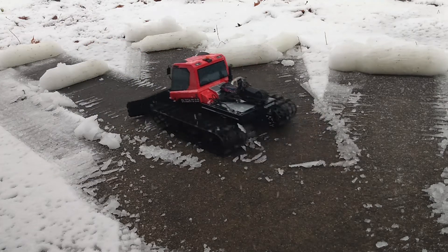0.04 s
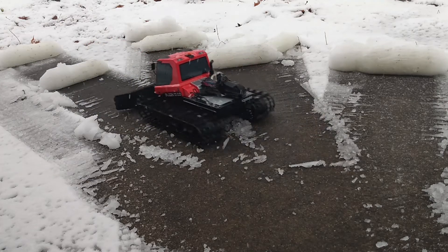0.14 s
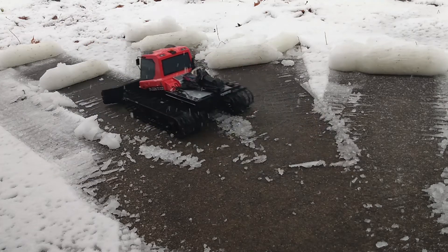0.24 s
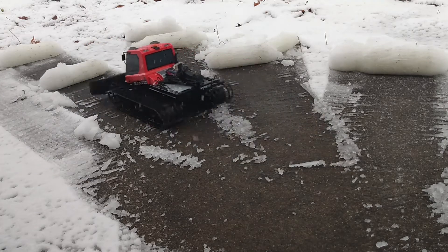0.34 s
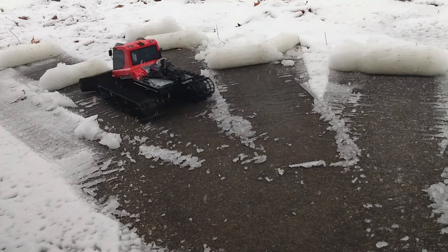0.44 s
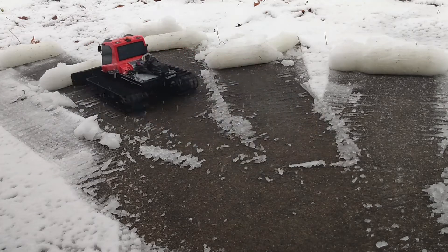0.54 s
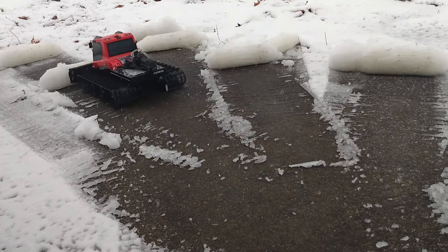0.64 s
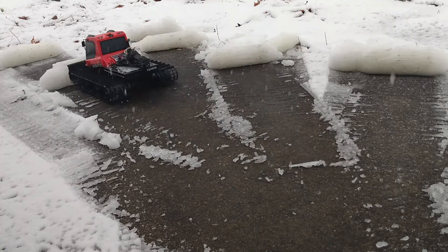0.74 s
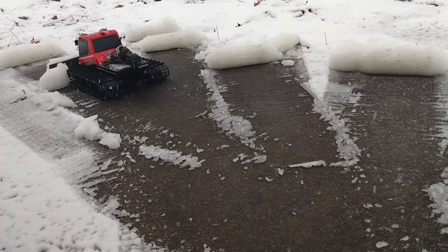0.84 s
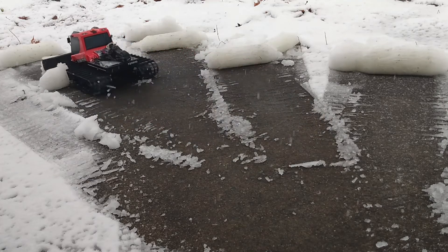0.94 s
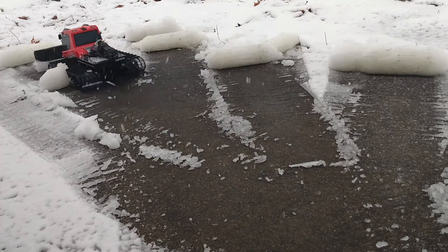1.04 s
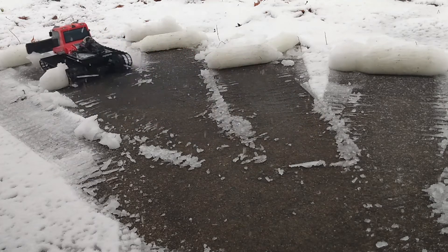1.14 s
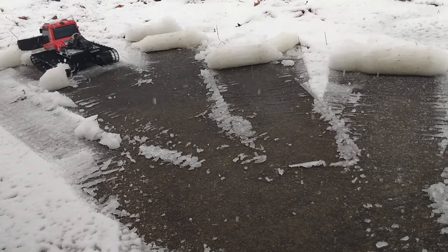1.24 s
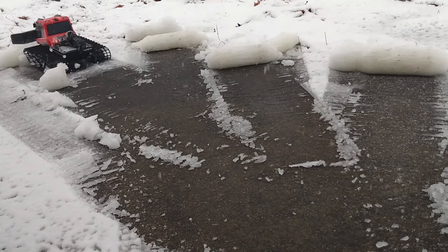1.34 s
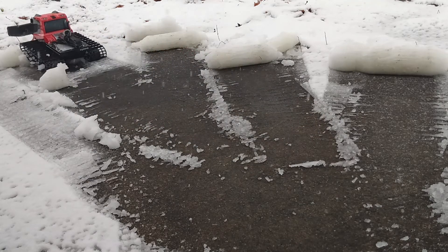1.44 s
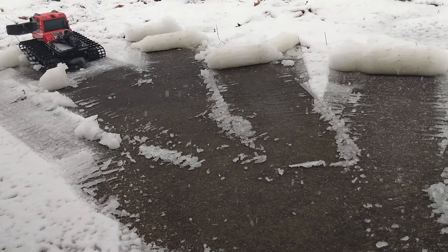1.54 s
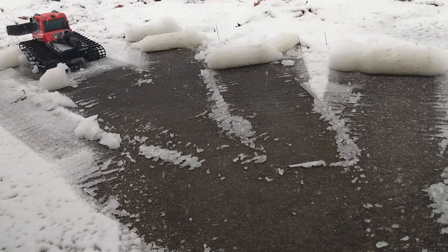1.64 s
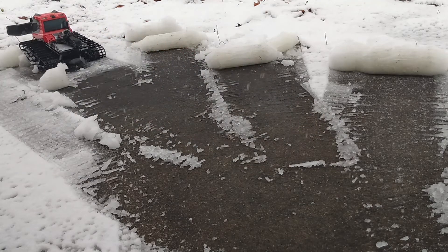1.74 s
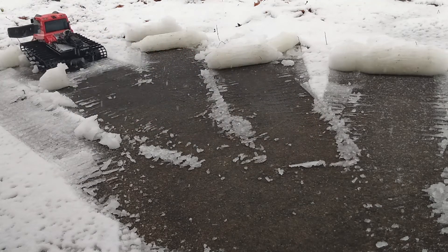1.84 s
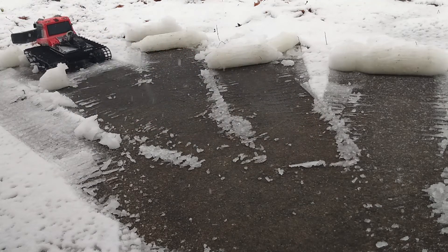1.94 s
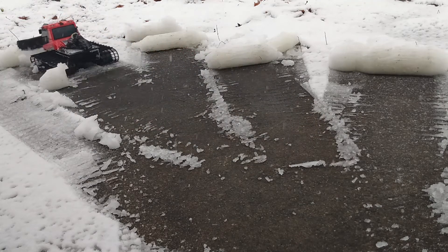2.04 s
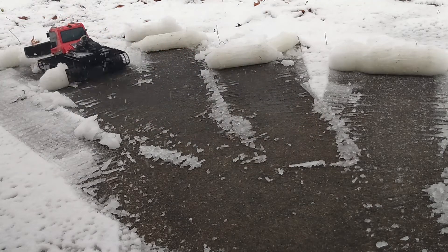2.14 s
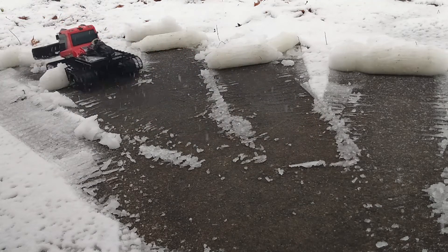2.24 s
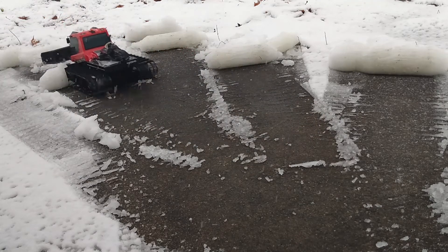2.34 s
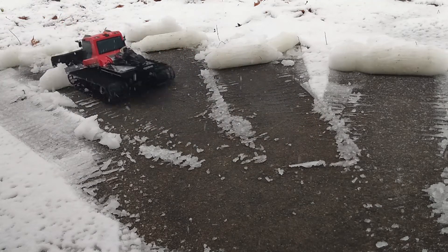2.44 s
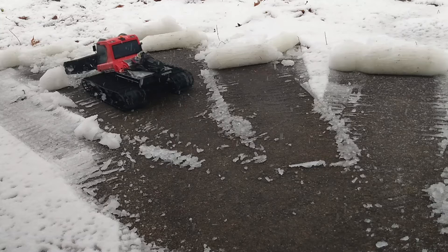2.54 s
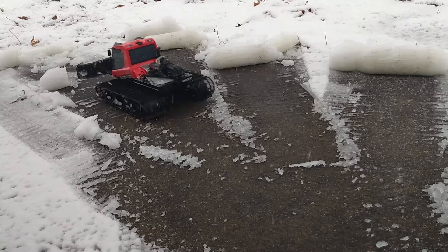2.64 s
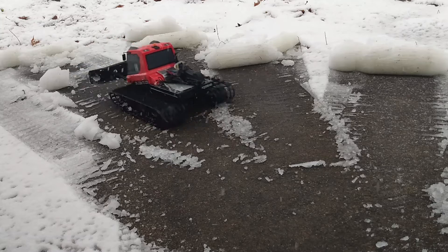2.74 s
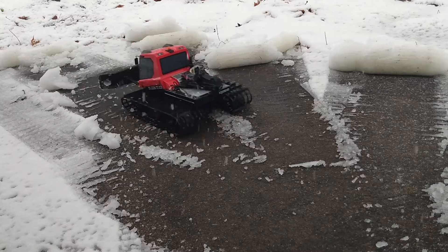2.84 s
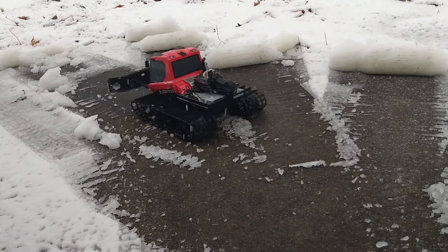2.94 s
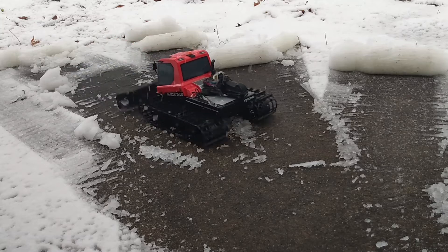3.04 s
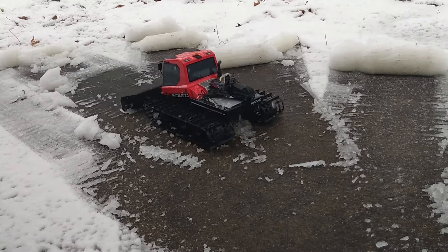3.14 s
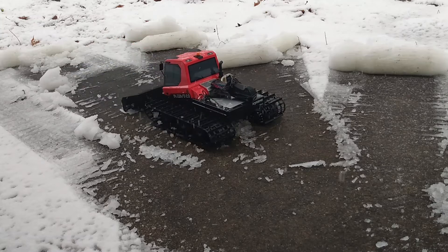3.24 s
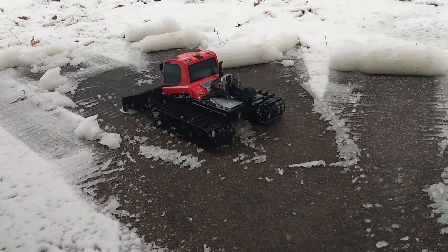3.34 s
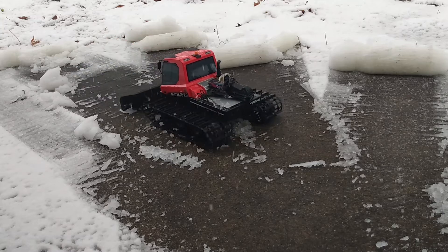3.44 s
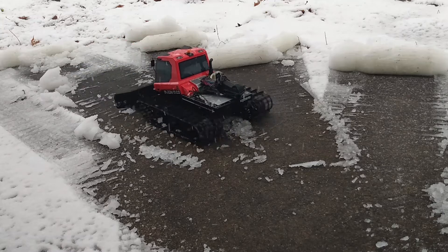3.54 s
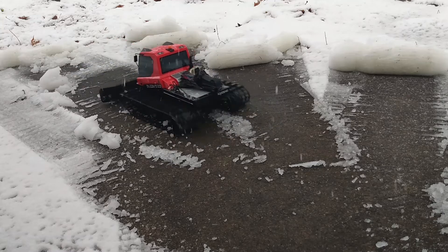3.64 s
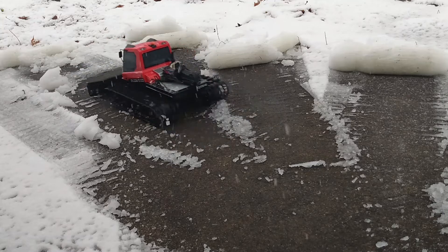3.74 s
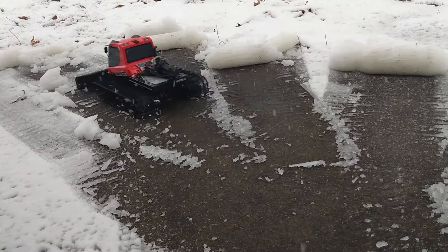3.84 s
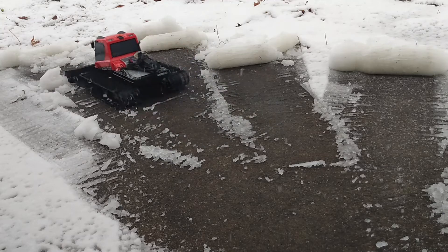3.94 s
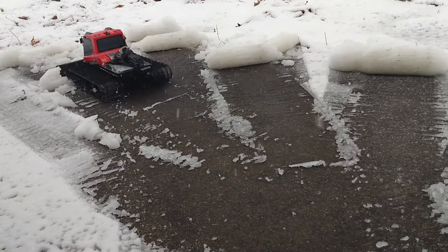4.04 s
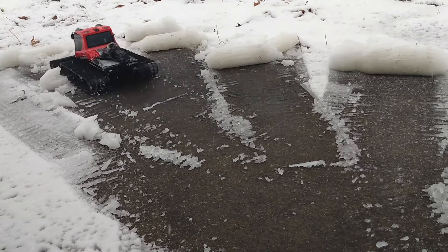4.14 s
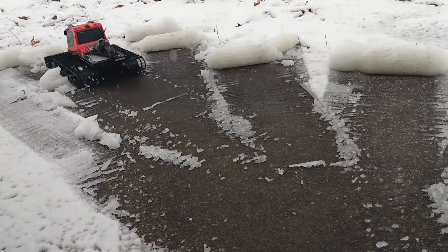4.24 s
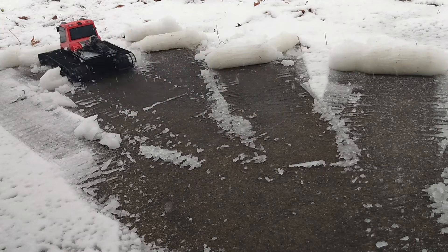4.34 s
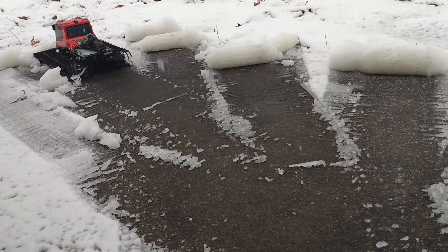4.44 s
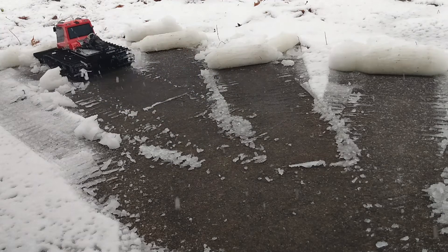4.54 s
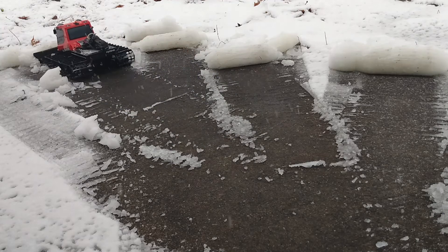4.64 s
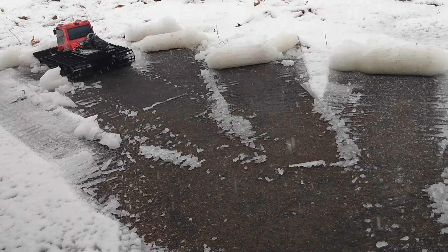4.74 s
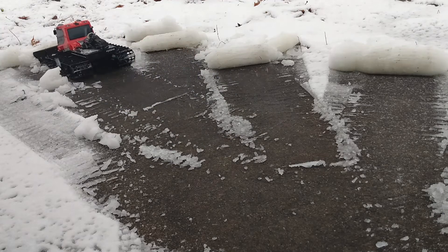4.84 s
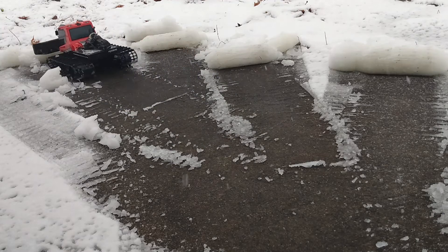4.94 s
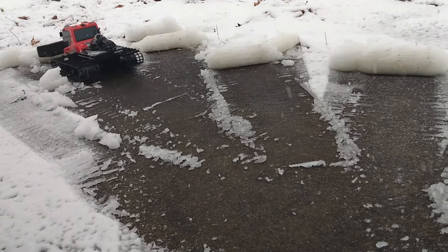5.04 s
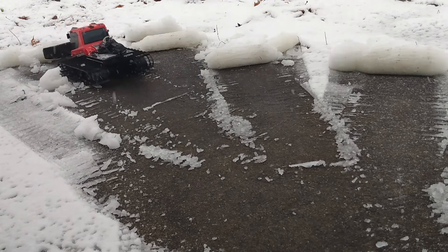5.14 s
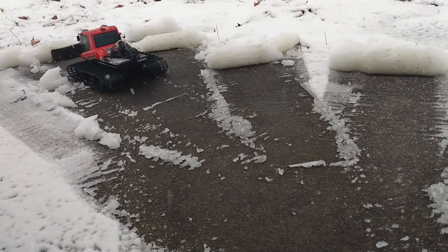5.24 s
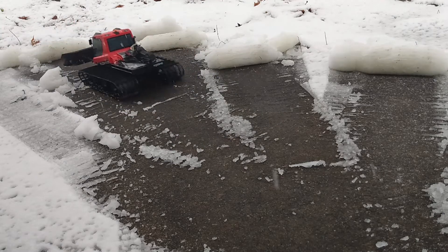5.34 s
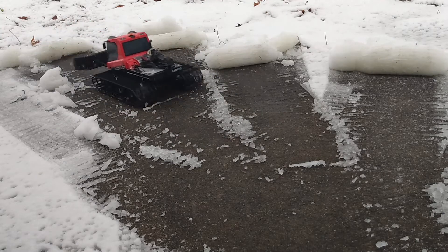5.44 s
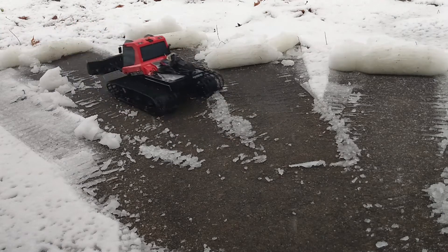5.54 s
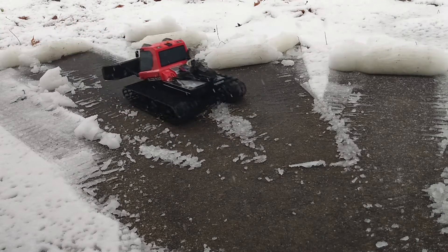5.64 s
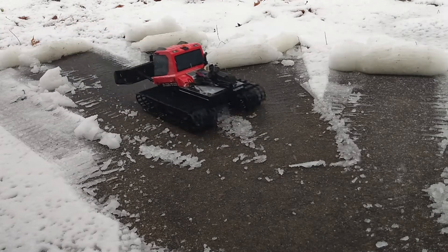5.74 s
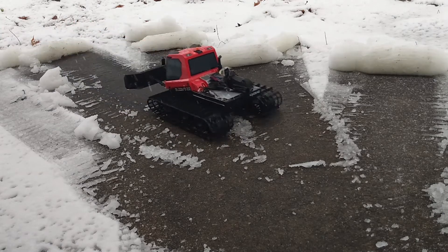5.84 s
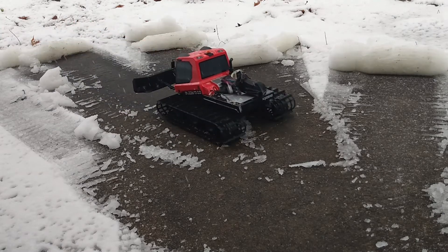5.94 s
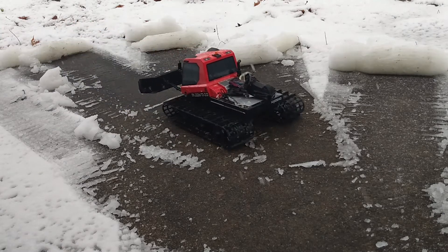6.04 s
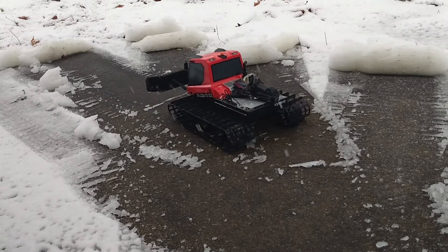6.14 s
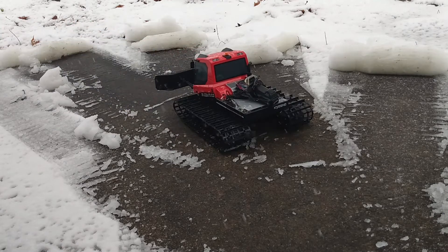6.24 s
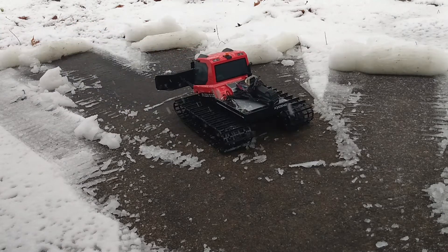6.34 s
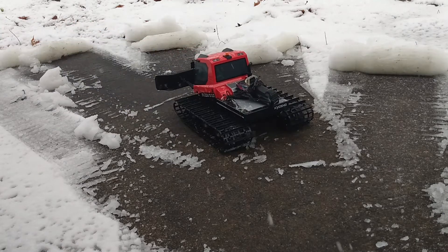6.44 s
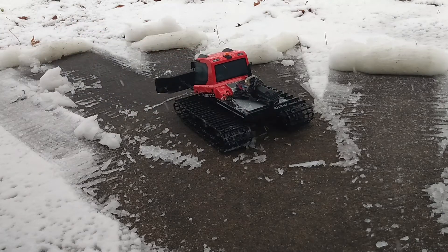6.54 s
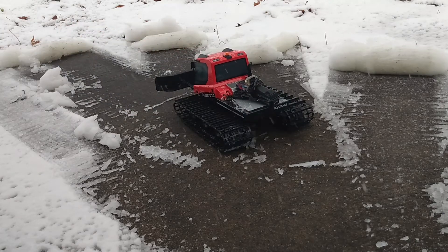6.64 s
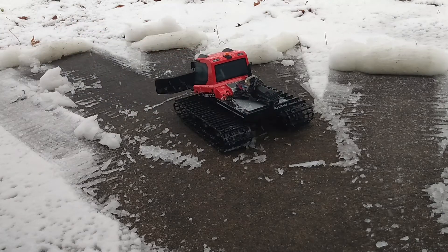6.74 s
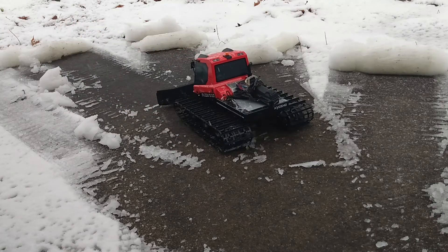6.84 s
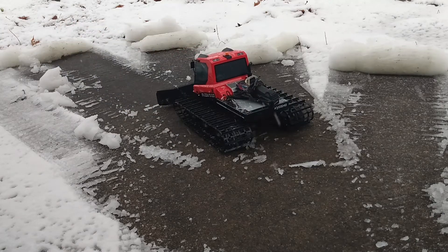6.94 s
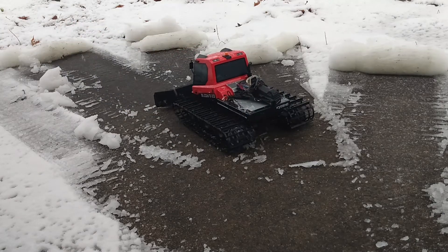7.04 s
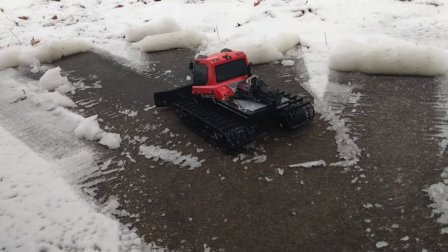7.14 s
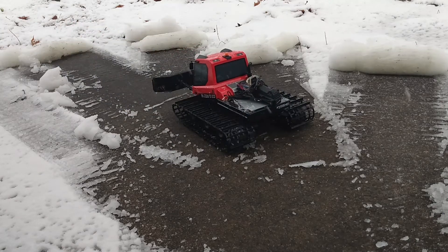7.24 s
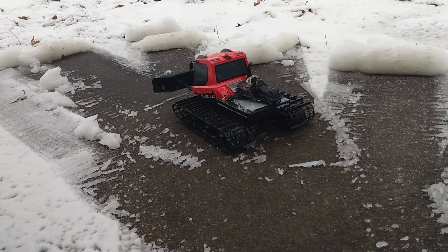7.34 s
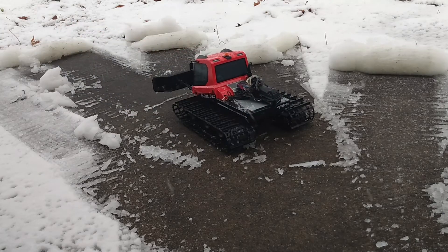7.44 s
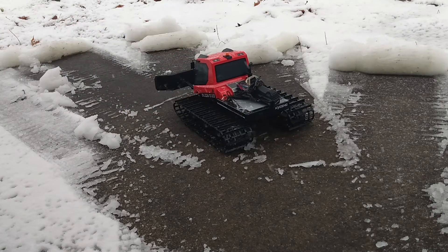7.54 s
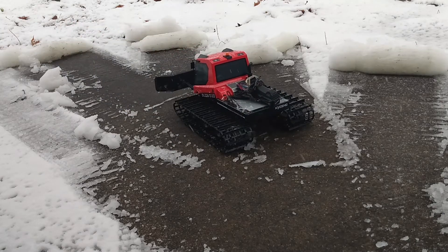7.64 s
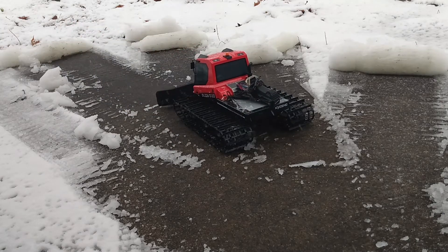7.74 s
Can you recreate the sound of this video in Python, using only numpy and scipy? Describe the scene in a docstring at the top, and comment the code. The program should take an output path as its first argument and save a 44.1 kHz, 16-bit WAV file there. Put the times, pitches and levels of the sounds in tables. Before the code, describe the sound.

A small electric tracked model drives over wet concrete outdoors, starting close to the microphone. Its tracks patter and clink, gears whine and slush fizzes underneath. The blade knocks hard at 0.4 seconds, followed by lighter clacks. The vehicle moves left, a little quieter, and crunches into snow with brief squeaks at about 1.3 seconds. After a short lull it reverses from 1.8 seconds, knocking as it comes close again by 3.3 seconds. A second run starts at 3.4 seconds with sharp ice snaps, knocks and a lower whine. It slows on the left around 4.7 seconds with more snaps, then backs up from 4.9 seconds and is near again by 6.2 seconds. From about 6.9 seconds to the end there are small, quieter nudges with a gritty hum, light knocks and ice ticks. Distant traffic rumbles low throughout.

```python
"""A small electric model snowcat drives off over wet concrete: its tracks patter, slush fizzes under them,
the gears whine, and the blade knocks hard at 0.4 s. It crunches into snow on the left, reverses from
1.8 s and is close again by 3.3 s. It makes the trip once more, snapping crumbs of ice, and is back by
6.2 s. It ends with small nudges, a gritty hum, light knocks and snaps. A town rumbles low throughout."""
import sys
import numpy as np
from scipy import signal
from scipy.fft import rfft, irfft
from scipy.io import wavfile
from scipy.ndimage import map_coordinates

SR = 44100
rng = np.random.default_rng(int(sys.argv[2]) if len(sys.argv) > 2 else 0)


def put_to_file(sound):
    """Save the sound as 16-bit audio at rate SR, in the file named by the first command-line argument."""
    columns = np.atleast_2d(sound).T  # one column per channel
    safe = np.clip(columns, -1, 1)
    whole_steps = np.round(safe * 32767)
    wavfile.write(sys.argv[1], SR, whole_steps.astype(np.int16))


N = 343980
TIME = np.arange(N) / SR


def amp(db):
    """Turns decibels into a number to multiply by."""
    return 10 ** (np.asarray(db) / 20)

def evened(x):
    """Scales a signal to an average power of 1."""
    return x / np.sqrt(np.mean(x ** 2) + 1e-20)

def curve_at(points, hz):
    """Looks up values between a table's frequencies, spaced by octaves."""
    f, value = np.transpose(points)
    return np.interp(np.log(hz + 1), np.log(f + 1), value)

def add(mix, start, sound):
    """Adds a sound to the mix at a time in seconds."""
    part = mix[max(round(start * SR), 0):][:len(sound)]
    part += sound[:len(part)]

def wander(hz):
    """A random wobble, up to about hz times a second."""
    f = np.fft.rfftfreq(N, 1 / SR)
    return evened(irfft(rfft(rng.standard_normal(N)) / (1 + (f / hz) ** 4), N))

def colour(x, points, peaks=(), size=4096):
    """Makes some frequencies louder and others softer; clicks ring only after they land."""
    hz = abs(np.fft.fftfreq(size, 1 / SR))
    lifts = sum(lift / (1 + (2 * (hz - f) / width) ** 2) for f, width, lift in peaks)
    log_gain = np.log(amp(curve_at(points, hz) + lifts))
    ring = np.fft.ifft(np.exp(np.conj(signal.hilbert(log_gain)))).real
    return signal.oaconvolve(x, ring[:size // 2])[:N]

def patter(per_s, spread_db):
    """Random clicks of uneven size; the average power stays the same at any rate."""
    size = amp(spread_db * np.clip(rng.standard_normal(N), -2, 2)) * rng.choice([-1, 1], N)
    return evened(size * (rng.random(N) < per_s / SR) / np.sqrt(per_s))

def scatter(x, ring_s):
    """Quick echoes off the hull and ground. Here and below, a ring time is the time to fade 60 dB."""
    t = TIME[:SR // 8]
    echoes = rng.standard_normal(len(t)) * amp(-60 * t / ring_s)
    uncoloured = irfft(np.exp(1j * np.angle(rfft(echoes, 2 * len(t)))))[:len(t)]
    return signal.oaconvolve(x, uncoloured / np.linalg.norm(uncoloured))[:N]

def push(start, rise, hold, fall):
    """The strength of one movement: it grows almost evenly, holds, then coasts to a soft stop."""
    up = np.clip((TIME - start) / rise, 0, 1)
    down = np.clip((start + rise + hold + fall - TIME) / fall, 0, 1)
    return up ** 1.3 * down ** 2.67


# Pushes of the throttle; the sprockets ring most in reverse: start/s, rise/s, hold/s, fall/s,
# close-up clatter/dB, then, compared with the clatter, slush/dB, gearbox/dB, sprockets/dB
THROTTLE = [(-.69, 1.21, .15, .66, -28.3, -6, -7, -11), (.72, .33, .28, .41, -27.5, -5.7, -5, -8),
            (1.795, .41, .6, .6, -27.6, -4.4, -6, -6), (2.97, .18, .01, .17, -35.5, -11.5, -11, -12),
            (3.395, .38, .76, .42, -25.3, -7.2, -5.5, -15), (4.6, .08, .02, .035, -30.5, -11, -6, -14),
            (4.88, .46, .36, .84, -27.6, -3.8, -5, -3.5), (4.95, .015, .06, .2, -36, -15, -5, -8),
            (6.09, .15, .03, .18, -38.8, -6, -11, -11), (6.95, .13, .02, .21, -43.5, -18, -14, -14),
            (7.495, .08, .01, .12, -43.5, -14, -10, -20)]
# Patches of slush squeezed out by blade and tracks: start/s, rise/s, fall/s, level/dB
SLUSH_PATCHES = [(.972, .012, .4, -43), (1.92, .07, .25, -45), (4.55, .06, .17, -41), (4.735, .04, .2, -50),
                 (5.04, .015, .12, -46), (5.05, .08, .42, -42), (6.86, .08, .12, -57),
                 (7.052, .012, .2, -53), (7.19, .02, .38, -55.5), (7.55, .02, .16, -54),
                 (7.67, .09, .13, -68.5)]

def drive(place, far_loss_db=13, deeper_slush_db=4, rest_db=-73, trickle_db=-82):
    """Levels in dB of clatter, slush, gearbox and sprockets: up with speed, down with distance."""
    clatter, fizz, gearbox, sprockets = np.zeros((4, N))
    for start, rise, hold, fall, db, slush_db, gear_db, sprocket_db in THROTTLE:
        level = push(start, rise, hold, fall) * amp(db - far_loss_db * place)
        clatter += level ** 2
        fizz += (level * amp(slush_db + deeper_slush_db * place)) ** 2
        gearbox += (level * amp(gear_db)) ** 2
        sprockets += (level * amp(sprocket_db)) ** 2
    for start, rise, fall, db in SLUSH_PATCHES:
        fizz += (push(start, rise, 0, fall) * amp(db)) ** 2
    clatter += amp(rest_db) ** 2  # faint ticking and trickling go on at a standstill
    fizz += amp(trickle_db) ** 2
    return 10 * np.log10([clatter, fizz, gearbox + 1e-12, sprockets + 1e-12])


# The tone of the cleats (the ribs on the tracks) hitting concrete: f/Hz, level/dB
CLEAT_TONE = [(30, -46.5), (60, -11.5), (110, -11), (165, -16), (225, -1.5), (380, -5.7), (520, -6),
              (1000, -3), (1400, -4.5), (1600, -3), (2300, -6.5), (2850, -11.5), (5000, -18.5), (8000, -32),
              (16000, -31)]
# Pitches the hull (the body) boosts or swallows: f/Hz, width/Hz, boost/dB
HULL_PEAKS = [(300, 54, 7.5), (480, 70, 5), (565, 50, 3.5), (650, 40, 4.5), (790, 60, -2), (875, 90, 5),
              (1150, 300, 3), (1378, 100, 7), (1555, 90, -3), (2120, 140, 2), (2450, 130, 3),
              (3000, 400, -2.5), (3850, 190, 8.5), (4420, 320, 9.5), (5450, 230, 8)]

def tracks(level_db, taps_per_s=1300, rub_db=-4, lurch_db=1, gain_db=-.77):
    """Cleats slap and rub on the ground, more often at speed, and the hull rings along."""
    pace = amp(.5 * (level_db + 29))
    loudness = amp(level_db + gain_db + lurch_db * wander(25))
    taps = np.array([patter(taps_per_s * (.1 + pace), spread_db=3) for _ in range(2)])
    rub = amp(rub_db) * np.sqrt(.2 + pace) * rng.standard_normal((2, N))
    pair = [colour(contact, CLEAT_TONE, HULL_PEAKS) for contact in taps + rub]
    return evened(np.array(pair)) * loudness


# The tone of the slush: f/Hz, level/dB
SLUSH_TONE = [(500, -7), (2000, 6.5), (3100, 3), (4400, 3.5), (5800, 2.8), (7200, -1.5), (8700, -3.3),
              (9700, -1.6), (10020, 1), (10400, -1.5), (12500, -0.7), (14200, 0.7), (16000, 1.5)]

def slush(level_db, grains_per_s=5000, spits_per_s=60, spit_db=-10, wash_db=-1, gain_db=4):
    """Squeezed water and ice grains make a fine, flickering fizz with a few bigger spits."""
    loudness = amp(level_db + gain_db + .97 * wander(38))
    spits = [amp(spit_db) * scatter(patter(spits_per_s, spread_db=4), ring_s=.014) for _ in range(2)]
    pair = []
    for spit in spits:
        grains = patter(grains_per_s, spread_db=3.5)
        wash = amp(wash_db) * rng.standard_normal(N)
        pair.append(colour(grains + spit + wash, SLUSH_TONE))
    return evened(np.array(pair)) * loudness


# The gearbox's notes at full speed: f/Hz, level/dB, ring time/s
GEARBOX_NOTES = [(1070, -5, .03), (1185, 0, .05)]
# The notes of the sprockets (toothed wheels that pull the tracks): f/Hz, level/dB, ring time/s
SPROCKET_NOTES = [(2165, 0, .02), (2470, -4.5, .02), (3880, -8, .014)]

def gear_teeth(level_db, notes, sag_per_db, gain_db=0, teeth_per_s=400, full_db=-37.5):
    """Teeth knock unevenly and keep up a ring whose pitch sags as the drive gets quieter."""
    t = TIME[:SR // 8]
    surge = wander(13)  # the tracks grip and slip, moving both pitch and level
    ring = sum(amp(db - 60 * t / ring_s) * np.sin(2 * np.pi * (hz * t + rng.random()))
               for hz, db, ring_s in notes)
    speed = 1 - sag_per_db * np.clip(full_db - level_db, 0, 5.5) + .028 * surge
    pair = []
    for _ in range(2):
        ringing = signal.oaconvolve(patter(teeth_per_s, spread_db=1.5), ring)[:N]
        pair.append(np.interp(np.cumsum(speed), np.arange(N), ringing))
    return evened(np.array(pair) * amp(1.6 * surge)) * amp(level_db + gain_db)


def links(level_db, low_hz=380, high_hz=4600, pitches=40, clinks_per_pitch=62, gain_db=-11):
    """Slack track links bunch up and let go in clumps of clinks, each with its own pitch."""
    clumps_per_s, clump_s, ring_cycles = 13, .022, 70
    t, out = TIME[:SR // 8], np.zeros((2, N))
    clumps = np.arange(0, N / SR, 1 / clumps_per_s)
    clumps += rng.random(len(clumps)) / clumps_per_s
    for hz in np.geomspace(low_hz, high_hz, pitches):
        for which, lag, detune, softness, angle in rng.random((clinks_per_pitch, 5)):
            start = clumps[int(which * len(clumps))] + clump_s * lag ** 2
            fade_db = 60 * t * hz / ring_cycles + .5 * np.log2(hz / low_hz) + 14 * softness
            clink = amp(-fade_db) * np.sin(2 * np.pi * hz * (.95 + .099 * detune) * t)
            add(out[0], start, clink * np.cos(2 * np.pi * angle))
            add(out[1], start, clink * np.sin(2 * np.pi * angle))
    return evened(out) * amp(level_db + gain_db)


# Gear whines and axle squeaks: start/s, length/s, first f/Hz, middle f/Hz, last f/Hz, level/dB
WHINE_NOTES = [(-.14, .7, 305, 432, 470, -43.5), (.24, .2, 1350, 1378, 1385, -43),
               (.8, .12, 372, 377, 386, -44.5), (.99, .04, 950, 1080, 1160, -38),
               (1.05, .06, 1110, 1130, 1170, -42), (1.27, .045, 1340, 1280, 1050, -40),
               (1.335, .055, 1130, 1122, 1090, -37.5), (2.05, .13, 1090, 1130, 1150, -44),
               (2.42, .2, 1150, 1185, 1170, -43), (2.68, .2, 1150, 1180, 1185, -41),
               (3.392, .04, 1300, 1330, 1350, -60), (3.72, .42, 1150, 1200, 1170, -40),
               (3.85, .25, 1400, 1335, 1320, -41.5), (3.87, .55, 279, 292, 284, -34),
               (5.13, .045, 2400, 2470, 2500, -38), (5.55, .19, 284, 291, 287, -41.5),
               (5.72, .17, 1170, 1190, 1195, -39.5), (5.7, .28, 1350, 1385, 1370, -43),
               (6.15, .15, 1140, 1170, 1150, -39.5), (7.235, .05, 4150, 3850, 3400, -64)]

def whines(throb=.37):
    """The drive sings under load, each note swelling and bending as the tracks tug at it."""
    out = np.zeros(N)
    waver = 1 + .012 * wander(45) + .02 * wander(500)  # the fast wobble roughens high squeaks
    for start, length, first_hz, middle_hz, last_hz, db in WHINE_NOTES:
        progress = np.clip((TIME - start) / length, 0, 1)
        bend = np.polyfit([0, .5, 1], [first_hz, middle_hz, last_hz], 2)
        hz = np.polyval(bend, progress) * waver
        swell = abs(np.sin(np.pi * progress)) ** .45
        out += np.sqrt(2) * amp(db) * swell * np.sin(2 * np.pi * np.cumsum(hz) / SR)
    return out * (1 + throb * wander(40))


# Knocks of the blade and running gear: t/s, level/dB, brightness/(dB per octave)
BLOWS = [(.4278, -9.3, -.5), (.502, -25, 2), (.541, -19, 1), (.602, -24, 2), (.652, -18, 3),
         (1.225, -23, -1), (1.836, -47, 0), (1.881, -45, 0), (1.941, -39, 1), (2.009, -33, 0),
         (2.078, -31, 0), (2.774, -19, 3), (3.144, -23, 4), (3.15, -24, 2), (3.168, -28, 1),
         (3.242, -35, 0), (3.439, -44, 1), (3.535, -28, 1), (3.627, -24, 1), (3.678, -20, -1),
         (4.966, -36, 2), (4.996, -37, 2), (5.045, -33, 1), (6.9355, -25, 2.5), (6.9395, -32, 2),
         (7.063, -35, 0), (7.102, -31, 2), (7.156, -38, 0), (7.239, -43, 1), (7.579, -33, -1),
         (7.718, -42, -3)]
# The notes of the struck blade: f/Hz, level/dB, ring time/s
BLADE_NOTES = [(244, -10, .075), (330, -13, .05), (511, -6, .05), (595, -3, .055), (680, -3, .022),
               (760, -3, .06), (1140, -3, .04), (1355, -2, .042), (1680, -2, .022), (1900, -4, .012),
               (2200, -5, .014)]

def knocks(contact_s=.0007, rattle_db=-11, rattle_s=.09):
    """Each blow makes the blade ring and shakes its loose joints."""
    t, out = TIME[:SR // 5], np.zeros(N)
    for start, db, tilt_db in BLOWS:
        detunes = 1 + .02 * rng.standard_normal(len(BLADE_NOTES))
        ring = np.zeros(len(t))
        for (hz, level, ring_s), detune in zip(BLADE_NOTES, detunes):
            fade = amp(level + tilt_db * np.log2(hz / 1000) - 60 * t / ring_s)
            # low and high notes swing opposite ways, so the clack takes a moment to build
            ring += np.sign(1000 - hz) * fade * np.sin(2 * np.pi * hz * detune * t)
        ring *= 1 - np.exp(-t / contact_s)
        top_hz = np.clip(2200 * amp(tilt_db), 900, 9000)
        band = signal.butter(2, [400, top_hz], "band", fs=SR, output="sos")
        rattle = signal.sosfilt(band, rng.standard_normal(len(t))) * amp(-60 * t / rattle_s)
        knock = ring / abs(ring).max() + amp(rattle_db) * rattle / abs(rattle).max()
        add(out, start, amp(db) * knock)
    return out


# Dull crunches of snow; the last two rows are a low, gritty hum near 440 Hz, perhaps the motor:
# start/s, rise/s, fall/s, first f/Hz, last f/Hz, level/dB
GRITTY_SWELLS = [(1.36, .1, .3, 760, 590, -45), (1.81, .25, .35, 900, 720, -44),
                 (2.2, .25, .35, 560, 640, -42), (3.6, .22, .7, 780, 740, -38),
                 (4.15, .35, .42, 590, 680, -39), (5.08, .2, .55, 520, 600, -39.5),
                 (6.94, .15, .25, 420, 450, -52), (7.51, .06, .14, 440, 430, -50)]

def crunch_and_hum(grains_per_s=400, wobble=.05, width_hz=420):
    """Tiny clicks ring briefly at a sliding pitch, heard as a dull crunch or a gritty hum."""
    grains, out = patter(grains_per_s, spread_db=3), np.zeros(N)
    bend = 1 + wobble * wander(20)
    smooth = signal.butter(2, width_hz / 2, fs=SR, output="sos")
    for start, rise, fall, first_hz, last_hz, db in GRITTY_SWELLS:
        hz = bend * np.interp(TIME, [start, start + rise + fall], [first_hz, last_hz])
        spin = np.exp(2j * np.pi * np.cumsum(hz) / SR)
        grit = (spin * signal.sosfilt(smooth, grains / spin)).real  # keeps only the band around hz
        out += amp(db) * push(start, rise, 0, fall) * evened(grit)
    return out


# Crumbs of ice breaking: t/s, peak level/dB, lowest f/Hz, ring time/s
ICE_CRUMBS = [(1.7644, -57, 12000, .01), (3.4715, -23, 12000, .025), (3.5468, -27, 3500, .02),
              (4.738, -31, 8000, .06), (4.766, -28, 2200, .06), (5.0774, -31, 4000, .03),
              (6.4822, -49, 12000, .012), (6.7765, -52, 12000, .012), (6.9355, -31, 2500, .022),
              (6.946, -39, 8000, .015), (7.079, -35, 7000, .03), (7.201, -40, 4000, .02),
              (7.582, -30, 7000, .02), (7.6226, -31.5, 9500, .014), (7.642, -41, 3000, .015),
              (7.654, -36.5, 9000, .014)]

def ice_snaps():
    """Crushed ice breaks with short, bright snaps: some a thin high tick, others a fuller crack."""
    t, out = TIME[:SR // 12], np.zeros(N)
    for start, db, low_hz, ring_s in ICE_CRUMBS:
        treble = signal.butter(2, low_hz, "high", fs=SR, output="sos")
        snap = signal.sosfilt(treble, rng.standard_normal(len(t))) * amp(-60 * t / ring_s)
        add(out, start, amp(db) * snap / abs(snap).max())
    return out


# Chirps of the barely turning motor: t/s, length/s, level/dB, brightness/(dB per octave)
MOTOR_CHIRPS = [(3.364, .04, -63.5, -9), (4.763, .018, -41, 3.5), (4.915, .03, -57, -14),
                (7.47, .05, -69, 0)]
# The tones in a chirp: multiple of the switching rate, level/dB
CHIRP_TONES = [(1, -9), (2, 0), (3, -8), (4, -8), (5, -9)]

def motor_chirps(switch_hz=933, jitter=.022):
    """At the lowest throttle, current switching on and off makes the motor sing thinly."""
    cycles, out = np.cumsum(switch_hz * (1 + jitter * wander(124))) / SR, np.zeros(N)
    for start, length, db, tilt_db in MOTOR_CHIRPS:
        phase = 2 * np.pi * cycles[round(start * SR):round((start + length) * SR)]
        tone = sum(amp(level + tilt_db * np.log2(k)) * np.sin(k * phase) for k, level in CHIRP_TONES)
        add(out, start, amp(db) * evened(tone) * signal.windows.tukey(len(tone), .5))
    return out


# The tone of far traffic: f/Hz, level/dB
TRAFFIC_TONE = [(15, -45.5), (30, -32.5), (42, -17.5), (56, 10), (68, -2.5), (82, 2), (100, -2), (120, -2),
                (155, -12), (210, -6.5), (270, -11), (400, -21), (1200, -42.5), (4000, -60), (16000, -50)]

def town(level_db=-49, side_db=-16, hum_hz=78.5, hum_db=-56):
    """Far traffic rumbles, nearly alike in both ears, with a wavering hum."""
    mid, side = (evened(colour(rng.standard_normal(N), TRAFFIC_TONE)) for _ in range(2))
    hz = hum_hz * (1 + .0157 * wander(4.04))
    hum = np.sqrt(2) * np.sin(2 * np.pi * np.cumsum(hz) / SR)
    return amp(level_db) * (mid + amp(side_db) * np.array([side, -side])) + amp(hum_db) * hum


# How alike left and right sound: f/Hz, likeness (0 to 1)
LIKENESS = [(100, 0.67), (300, 0.9), (700, 0.78), (1500, 0.68), (3000, 0.42), (7000, 0.22), (16000, 0.05)]

def microphones(direct, diffuse, place, near_lead_samples=.97, far_lead_samples=8):
    """Sound reaches the left microphone first; its diffuse (scattered) part makes the sides differ."""
    alike = np.clip(curve_at(LIKENESS, np.fft.rfftfreq(N, 1 / SR)), 0, 1)
    mid = irfft(rfft(direct) * np.sqrt((1 + alike) / 2), N)
    side = irfft(rfft(diffuse) * np.sqrt((1 - alike) / 2), N)
    shift = (near_lead_samples + (far_lead_samples - near_lead_samples) * place) / 2
    return np.array([map_coordinates(mid + sign * side, [np.arange(N) + sign * shift],
                                     order=5, mode="nearest") for sign in (1, -1)])


# Where the snowcat is: t/s, place (0 = near and straight ahead, 1 = far left at the snow's edge)
ROUTE = [(0, 0.021), (1.7, 0.99), (3.3, 0.0039), (4.85, 0.93), (6.2, 0)]

def scene():
    """The snowcat drives to and fro in front of the microphones, over the town's rumble."""
    place = np.interp(TIME, *np.transpose(ROUTE))
    clatter_db, fizz_db, gearbox_db, sprocket_db = drive(place)
    events = knocks() + ice_snaps() + crunch_and_hum() + whines()
    # each running sound comes as a pair: a direct part and a diffuse part
    direct, diffuse = (tracks(clatter_db) + slush(fizz_db)
                       + gear_teeth(gearbox_db, GEARBOX_NOTES, sag_per_db=.009, gain_db=-1)
                       + gear_teeth(sprocket_db, SPROCKET_NOTES, sag_per_db=.002)
                       + links(clatter_db))
    direct += events + motor_chirps()
    diffuse += scatter(events, ring_s=.033)
    return microphones(direct, diffuse, place) + town()


# How much louder the left microphone is than the right: f/Hz, level/dB
LEFT_BOOST = [(100, 0), (250, 1), (550, 1.4), (1200, -.5), (2500, .6), (5000, -.2), (8500, -1.3),
              (13000, 1)]

def record(dry, top_hz=15950):
    """The two microphones differ a little in tone, and the very highest treble is cut off."""
    left_db = curve_at(LEFT_BOOST, np.fft.rfftfreq(N, 1 / SR))
    heard = irfft(rfft(dry) * amp(np.array([left_db, -left_db]) / 2), N)
    treble_cut = signal.firwin(511, top_hz, window=("kaiser", 9), fs=SR)
    return signal.oaconvolve(heard, treble_cut[None], "same")


dry = scene()
out = record(dry)
put_to_file(out)
```